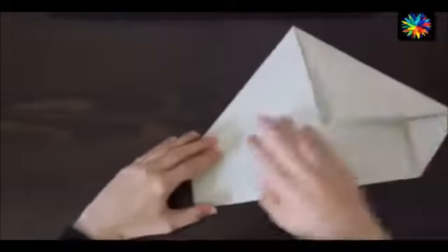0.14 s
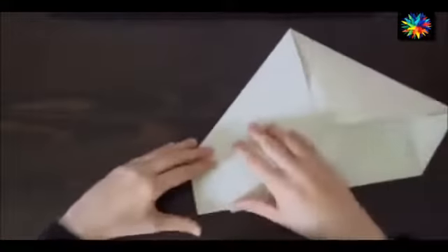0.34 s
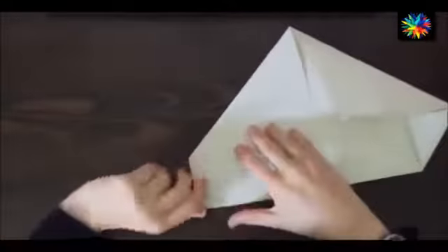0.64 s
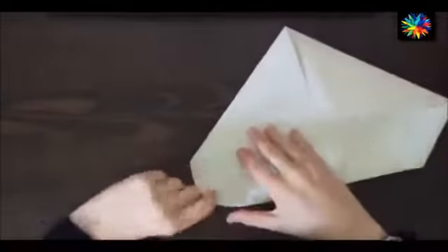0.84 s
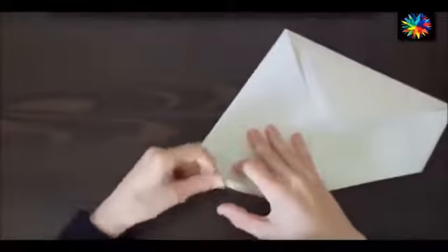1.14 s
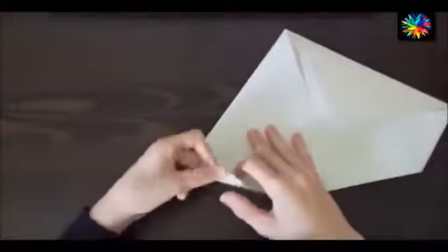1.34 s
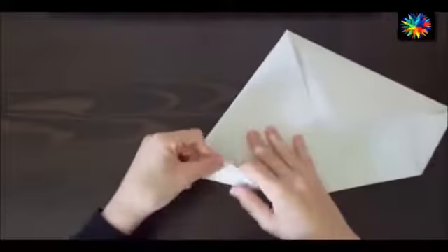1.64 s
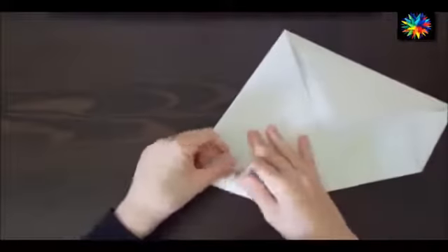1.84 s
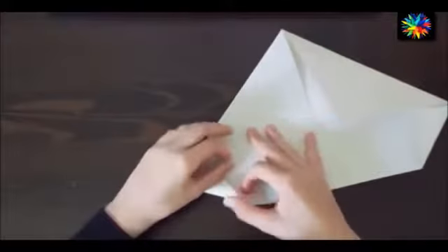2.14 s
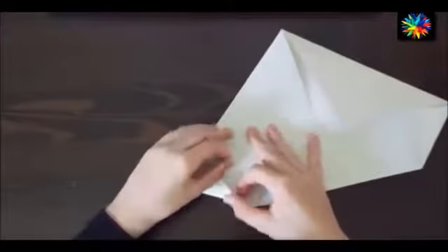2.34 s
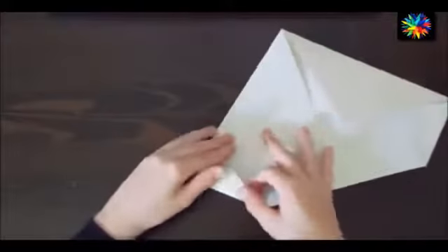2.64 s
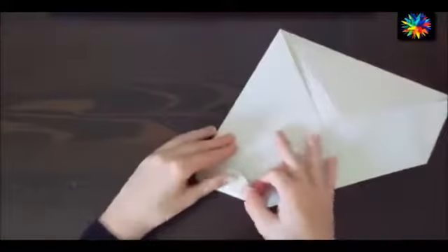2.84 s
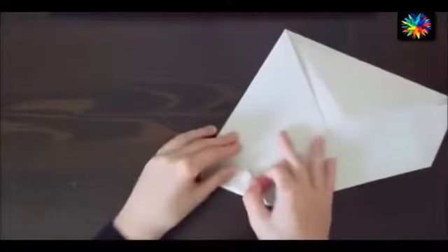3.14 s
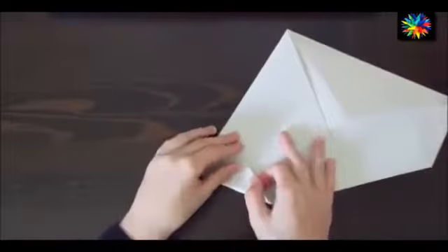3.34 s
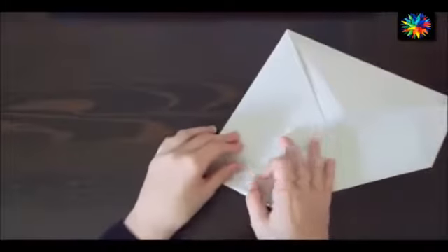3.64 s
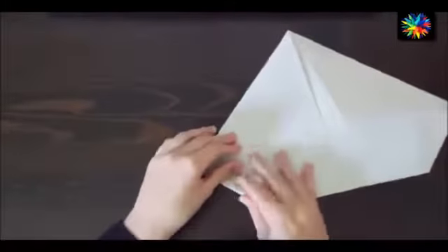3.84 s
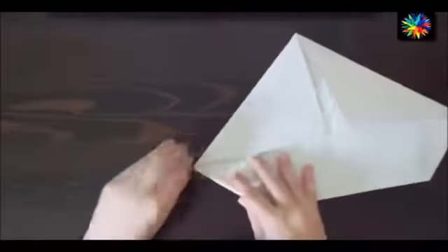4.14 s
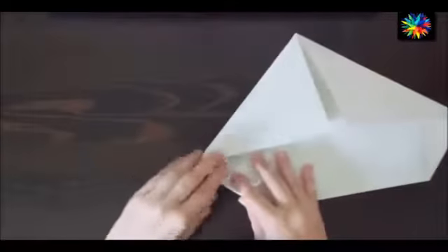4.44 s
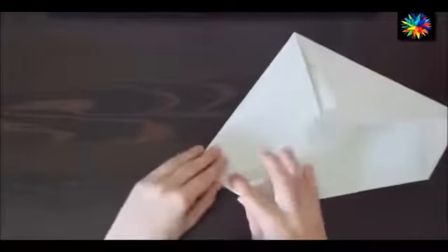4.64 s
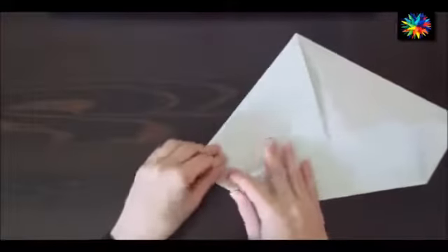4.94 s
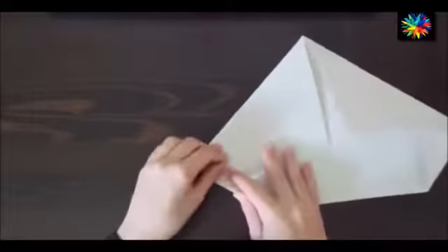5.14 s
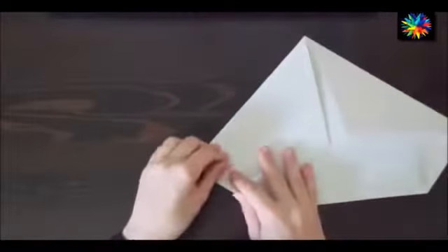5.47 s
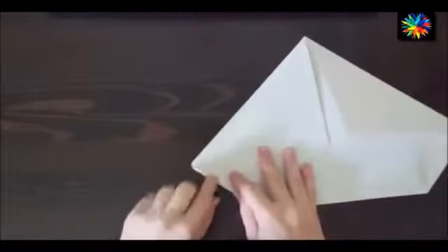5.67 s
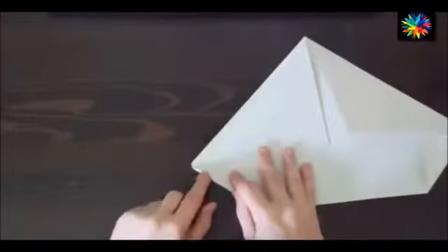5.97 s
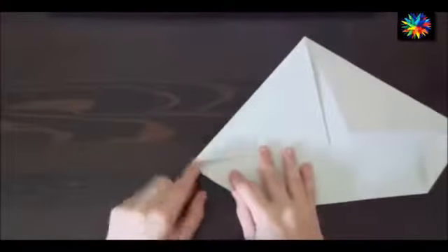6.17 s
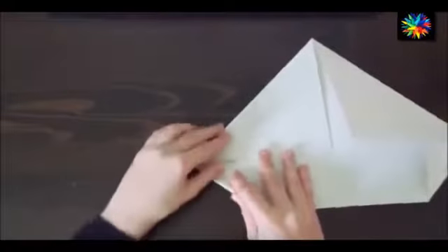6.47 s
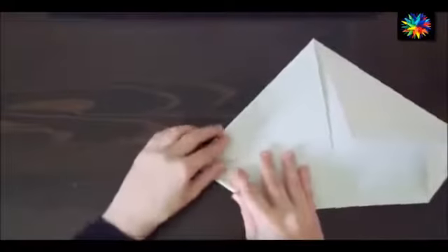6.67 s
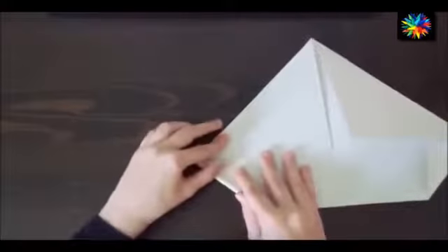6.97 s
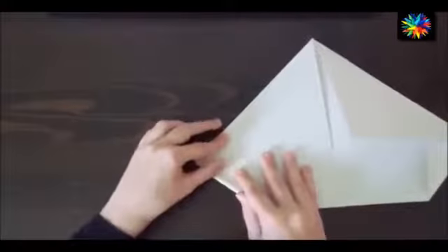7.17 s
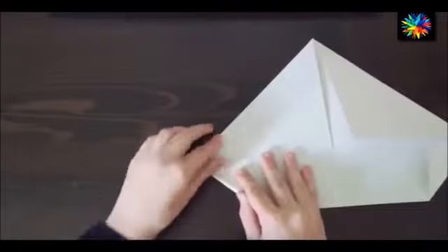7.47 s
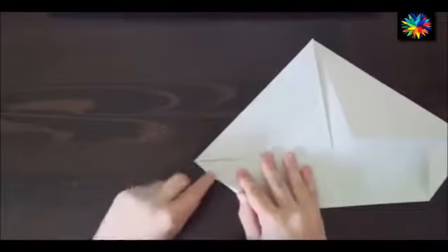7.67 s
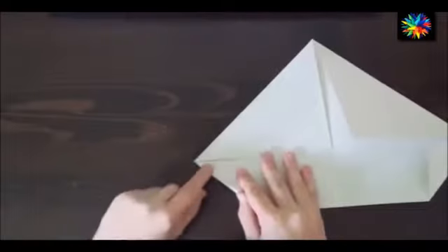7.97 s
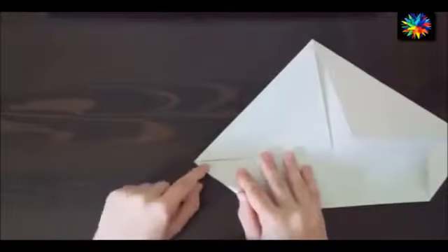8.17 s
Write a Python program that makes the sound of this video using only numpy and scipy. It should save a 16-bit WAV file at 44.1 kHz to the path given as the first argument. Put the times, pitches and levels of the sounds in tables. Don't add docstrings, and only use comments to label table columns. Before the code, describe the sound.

Close stereo pickup of a stiff paper sheet folded on a wooden table in a small room. Fingers hiss and rustle busily over it, with bright snaps near two and three seconds, the loudest just after three. Soft hand thumps and dull distant knocks sit underneath. Another pair of hard cracks comes past five seconds, then faint smoothing and tiny ticks over low rumble and hiss.

```python
import sys
import numpy as np
from scipy import signal
from scipy.fft import rfft, irfft
from scipy.io import wavfile
from scipy.ndimage import uniform_filter1d

SR = 44100
rng = np.random.default_rng(int(sys.argv[2]) if len(sys.argv) > 2 else 0)


def dump(signal):
    limited = np.clip(np.atleast_2d(signal).T, -1, 1)
    pcm = np.round(limited * 32767).astype(np.int16)
    wavfile.write(sys.argv[1], SR, pcm)


def level_to_linear(level):
    exponent = np.asarray(level, float) / 20
    return 10 ** exponent


N = 366471
CUTOFF_HZ = 14100


def rms_one(x):
    return x / np.sqrt(np.mean(x ** 2) + 1e-20)


def in_time(rows):
    s, values = np.transpose(rows)
    return np.interp(np.arange(N) / SR, s, values)


def at_hz(points, hz):
    point_hz, values = np.transpose(points)
    return np.interp(np.log(hz), np.log(point_hz), values)


def drift(rate):
    r = np.exp(-80 * np.pi * rate / SR)
    slow = signal.lfilter([1], [1, -2 * r, r * r], rng.standard_normal(N // 40 + 2002))[2000:]
    return np.interp(np.arange(N) / 40, np.arange(len(slow)), rms_one(slow))


def shaped(x, spectrum):
    hz = np.maximum(np.fft.rfftfreq(N, 1 / SR), 1)
    low_end = np.minimum(1, hz / spectrum[0][0]) ** 3
    return rms_one(irfft(rfft(x) * level_to_linear(at_hz(spectrum, hz)) * low_end, N))


def peak(x, hz, width_hz):
    r = np.exp(-np.pi * width_hz / SR)
    top = (1 - r * r) / 2 * np.array([1, 0, -1])
    return signal.lfilter(top, [1, -2 * r * np.cos(2 * np.pi * hz / SR), r * r], x)


def high_pass(x, order, hz):
    return signal.sosfilt(signal.butter(order, hz, "high", fs=SR, output="sos"), x)


def low_pass(x, order, hz):
    return signal.sosfilt(signal.butter(order, hz, "low", fs=SR, output="sos"), x)


def stereo_noise(spectrum):
    # (f/Hz, likeness 0 to 1)
    likeness = [(30, 0.88), (130, 0.407), (600, 0.45), (3000, 0.1), (14000, 0.08)]
    alike = np.clip(at_hz(likeness, np.maximum(np.fft.rfftfreq(N, 1 / SR), 1)), 0, 1)
    mid, side = rfft(rng.standard_normal((2, N)))
    both = np.sqrt(1 + alike) * mid + np.sqrt(1 - alike) * side * [[1], [-1]]
    return shaped(irfft(both, N), spectrum)


def room_noise():
    # (f/Hz, level/dB per Hz)
    floor_colour = [(71, -18.5), (120, -6), (250, -4.5), (550, -8), (765, -11), (2110, -15.5), (6000, -18),
                    (14000, -18.5)]
    # (t/s, level/dB)
    calming = [
        (0, -53.5),
        (.83, -54),
        (.95, -57),
        (1.7, -55),
        (3.3, -55.5),
        (3.4, -60),
        (4.9, -58),
        (6.1, -63.5),
        (8.31, -63),
    ]
    return level_to_linear(in_time(calming) + 5.0 + 0.28 * drift(11.5)) * stereo_noise(floor_colour)


def table_rumble():
    # (f/Hz, level/dB per Hz)
    rumble_colour = [(8.8, -27.5), (15, 12), (48, -4.5), (70, 0.5), (134, -9.5), (160, -11), (210, -50),
                     (350, -120)]
    # (t/s, level/dB)
    leaning = [(0, -64), (.1, -51), (.39, -48), (.51, -50), (1.16, -57.5), (1.67, -52), (1.83, -61),
               (1.96, -51), (2.24, -61), (2.36, -51), (2.5, -55.5), (3.66, -58), (3.82, -58), (5.0, -58.5),
               (6.43, -61.5), (7.17, -59.5), (7.8, -61.5), (8.0, -62)]
    return level_to_linear(in_time(leaning) + 2.0 * drift(10.0)) * stereo_noise(rumble_colour)


def motor_hum():
    # (f/Hz, level/dB rms)
    tones = [(30, -71), (60, -68.5), (90, -74.5), (120, -71.5), (150, -75.5), (210, -73)]
    t = np.arange(N) / SR
    return sum(level_to_linear(db + 1.0 + 2.0 * drift(3.77)) * np.sin(2 * np.pi * hz * t) for hz, db in tones)


def thumps():
    # (t/s, peak level/dB, f/Hz)
    landings = [
        (0.037, -43.5, 113),
        (0.351, -37.5, 111.3),
        (3.886, -41, 121),
        (6.545, -48.5, 100.3),
        (7.763, -49.5, 95),
    ]
    out = np.zeros(N)
    for s, peak_db, hz in landings:
        t = np.maximum(np.arange(N) / SR - s, 0)
        out += level_to_linear(peak_db - 60 * t / 0.24) * (1 - np.exp(-t / 0.0054)) * np.sin(2 * np.pi * hz * t)
    return out


def knocks():
    # (t/s, peak level/dB)
    blows = [
        (0.413, -36),
        (0.486, -46.5),
        (1.2856, -37.5),
        (2.1629, -38.5),
        (3.255, -39.5),
        (3.541, -43.5),
    ]
    # (f/Hz, level/dB, time to fall by 60 dB/s)
    modes = [(598, -1.5, 0.034), (645, -5, 0.034), (476, -9, 0.09), (367, -7, 0.11), (243, -9, .09),
             (790, -11, 0.039), (1220, -7.5, 0.029), (931, -5, .06), (1820, -3, .03)]
    s, peak_db = np.transpose(blows)
    at, out = np.round(s * SR).astype(int), np.zeros(N)
    for hz, level_db, t60 in modes:
        clicks = np.full(N, 1e-18)
        clicks[at] = level_to_linear(peak_db + level_db + rng.normal(0, 1.5, len(at)))
        clicks[at + 76] = 0.64 * clicks[at]
        clicks[at + 790] = -.5 * clicks[at]
        clicks[at + 1500] = .3 * clicks[at]
        r, w = level_to_linear(-60 / (t60 * SR)), 2 * np.pi * hz / SR
        out += signal.lfilter([0, np.sin(w)], [1, -2 * r * np.cos(w), r * r], clicks)
    return peak(signal.lfilter([.1], [1, -.9], out), 540, 900) * 1.72


def room(x):
    t = np.arange(SR // 2) / SR
    mid, side = rng.standard_normal((2, len(t))) * (1 - np.exp(-t / 0.014))
    tail = (mid + side * [[1], [-1]]) * level_to_linear(-60 * t / 0.22)
    dull = low_pass(tail, 1, 9800)
    tail = dull + .5 * (tail - dull) * level_to_linear(-200 * t)
    tail = tail / np.sqrt(np.sum(tail ** 2) / 2)
    return signal.fftconvolve(x[None], tail, axes=1)[:, :N]


def pressure(s, swell_s, fade_s, db):
    out, t = np.zeros(N), np.arange(N) / SR
    for at, up, down, gain in zip(s, np.maximum(swell_s, .004), np.maximum(fade_s, .004), level_to_linear(db)):
        near = slice(max(int((at - up) * SR), 0), int((at + down) * SR) + 1)
        out[near] += gain * np.interp(t[near], [at - up, at, at + down], [0, 1, 0])
    return out


def fibres(per_s, spread_db):
    sizes = level_to_linear(spread_db * np.minimum(rng.exponential(1, N), 5)) * rng.choice([-1, 1], N)
    slips = sizes * (rng.random(N) < per_s / SR)
    return rms_one(slips) * .5 + rng.standard_normal(N)


def bending(x, depth_db):
    spec = signal.stft(x, nperseg=512)[2]

    def patches(frames, bins):
        chance = uniform_filter1d(rng.standard_normal(spec.shape), size=frames, axis=1)
        return rms_one(uniform_filter1d(chance, size=bins, axis=0))

    field = patches(12, 2) + 0.23 * patches(20, 20)
    return rms_one(signal.istft(spec * level_to_linear(depth_db * field), nperseg=512)[1][:N])


def slide():
    # (f/Hz, level/dB per Hz)
    hiss_colour = [(1500, -14.5), (2500, -2), (3500, 10.5), (5000, 6), (7000, 1), (9000, 2), (11500, 0.5),
                   (13000, 6), (14200, 0)]
    # (f/Hz, level/dB per Hz)
    drum_colour = [(300, -28), (700, -1.5), (1200, -5), (2000, -2), (2800, -2.5), (4500, -29)]
    # (full pressure t/s, swell/s, fade/s, rub level/dB, dry fingertip hiss over
    # it/dB)
    finger_strokes = [(0.0, .01, 0.036, -47, -3), (.03, 0.039, 0.044, -57, 13.5), (.06, 0.025, 0.019, -44, -13),
                      (.175, 0.13, 0.24, -42.5, 8), (.359, 0.021, 0.031, -44.5, 8), (.451, 0.094, 0.035, -47, 6.5),
                      (0.683, 0.12, 0.036, -49.5, 12), (.845, 0.017, 0.058, -43.5, 6.5),
                      (.92, 0.032, 0.051, -51.5, 6), (1.003, 0.051, 0.045, -39.5, 6.5),
                      (1.133, 0.11, 0.076, -47, 6), (1.256, 0.13, 0.03, -44.5, 9), (1.425, 0.23, 0.054, -55, 11.5),
                      (1.742, 0.02, 0.042, -51, -2), (1.798, 0.0046, 0.049, -49, 3), (1.83, .005, 0.037, -46, 11),
                      (1.828, 0.044, 0.4, -49, 5.5), (1.949, 0.086, 0.072, -44.5, 7),
                      (2.122, 0.084, 0.055, -47, 14), (2.223, 0.033, 0.028, -51.5, 8.5),
                      (2.315, 0.02, 0.11, -43.5, -4), (2.407, 0.11, 0.27, -55, 5), (2.602, 0.08, 0.099, -46.5, 7),
                      (2.765, 0.11, 0.066, -46, 7.5), (2.85, 0.053, 0.13, -54, 5.5),
                      (3.001, 0.034, 0.034, -50.5, 9.5),
                      (3.273, 0.27, 0.043, -48, 2), (3.313, 0.021, 0.069, -36.5, 6),
                (3.564, 0.12, 0.058, -52.5, 7), (3.716, 0.044, 0.06, -49, 6), (3.887, 0.13, 0.13, -51, 7),
                (4.035, 0.064, 0.045, -52, -1), (4.27, 0.29, 0.014, -49, 9.5),
                (4.3, 0.032, 0.15, -62.5, 8.5), (4.641, 0.067, 0.062, -64, 3),
                (4.749, 0.085, 0.061, -54, 1.5), (4.869, 0.12, .056, -51, 0.5),
                (5.001, 0.057, 0.12, -61.5, 7), (5.136, 0.11, 0.064, -61, -7), (5.192, 0.068, 0.07, -63, 5),
                (5.503, 0.26, 0.031, -68, 11), (5.691, 0.088, 0.06, -58, 12),
                (5.743, 0.061, 0.12, -49, 4.5),
                      (5.946, 0.025, 0.036, -60, 5.5), (6.034, 0.025, 0.034, -64.5, 9),
                 (6.287, .028, 0.087, -75, -2), (6.389, 0.1, 0.074, -60, 3.5),
                 (6.541, 0.046, 0.077, -63, 6), (6.605, 0.048, 0.08, -56, 2), (6.765, 0.023, 0.14, -62, 6),
                 (6.878, 0.045, 0.048, -52.5, 7), (7.082, 0.19, 0.058, -69.5, 5),
                 (7.507, 0.056, 0.1, -66.5, 7.5), (7.627, 0.063, 0.095, -57.5, 13),
                 (7.734, 0.033, 0.024, -46.5, 9.5), (7.774, 0.036, 0.11, -55, 8),
                 (7.898, 0.14, 0.026, -60, 3), (8.058, .036, 0.036, -63.5, -4)]
    # (t/s, swell/s, fade/s, drumming level/dB)
    flaps = [(.06, 0.023, 0.016, -33), (.359, 0.026, 0.032, -44.5), (1.46, 0.16, 0.086, -63),
             (1.828, 0.1, 0.26, -51), (2.15, 0.067, 0.1, -49), (2.602, 0.21, 0.06, -57),
             (2.766, 0.096, 0.098, -51), (3.312, 0.04, 0.061, -49), (3.716, 0.031, 0.052, -51),
             (4.035, 0.097, 0.071, -58), (4.689, 0.03, 0.03, -47), (4.9, 0.05, 0.11, -64.5),
             (6.605, 0.038, 0.069, -57.5)]
    # (t/s, drumming level/dB)
    restless = [(0, -56), (.55, -72), (.8, -81), (.95, -59), (1.6, -61), (2.3, -79.5), (3.1, -72),
                (3.45, -59), (3.65, -72), (3.8, -73), (4.55, -81), (5.05, -61), (5.3, -77), (5.56, -69),
                (5.88, -71), (6.2, -79), (7.4, -78), (8.31, -73)]
    s, swell_s, fade_s, rub_db, dry_db = np.transpose(finger_strokes)
    rest = level_to_linear(in_time(restless))
    strokes = pressure(s, swell_s, fade_s, rub_db)
    rub = strokes + level_to_linear(-18.5) * rest
    dry_rub = pressure(s, swell_s, fade_s, rub_db + dry_db) + level_to_linear(-11.5) * rest
    drumming = rest + level_to_linear(-10) * strokes + pressure(*np.transpose(flaps))
    hiss = bending(shaped(fibres(6000, spread_db=-1.5), hiss_colour), depth_db=3.0)
    upper = rms_one(high_pass(hiss, 4, 7300))
    lower = rms_one(low_pass(hiss, 4, 7300))
    drum = bending(shaped(fibres(1500, spread_db=1.5), drum_colour), depth_db=2.0)
    grip = level_to_linear(-3.5 + 0.85 * drift(22.0) + 0.96 * drift(140.0))
    return grip * (dry_rub * upper + rub * lower + drumming * drum)


def singing():
    # (t/s, swell/s, fade/s, level/dB, f/Hz)
    songs = [(.06, 0.015, 0.013, -36.5, 2300), (.17, 0.061, .08, -44.5, 4570),
             (1.15, 0.076, 0.16, -49.5, 3200), (1.24, 0.11, .03, -50, 3600),
             (1.15, 0.092, 0.15, -44.5, 8800), (1.42, 0.061, 0.039, -49.5, 3830),
             (1.83, .005, .02, -42, 1710), (1.958, .02, 0.016, -37, 3350), (1.96, 0.047, .012, -41, 2540),
             (2.042, 0.017, .01, -44, 3600), (2.594, .007, .012, -45, 5600),
             (2.615, 0.013, 0.018, -44, 1500), (2.64, 0.024, 0.018, -45.5, 1790),
             (2.75, .015, .012, -48, 1740), (3.32, .02, 0.067, -42, 5800),
             (3.717, 0.0037, 0.0034, -36.5, 2080), (4.69, .02, .03, -57, 1500),
             (5.15, 0.016, .05, -49, 4500), (.85, .02, .03, -46, 8800), (1.005, .02, 0.027, -35, 9950),
             (1.47, .01, 0.061, -51.5, 2600), (2.592, 0.0046, 0.023, -48, 1700),
             (4.79, .01, .015, -51, 4970), (6.599, 0.012, 0.028, -54.5, 348), (6.72, .01, 0.031, -56, 343),
             (7.77, 0.01, 0.038, -54.5, 306)]
    white, out = rng.standard_normal(N), np.zeros(N)
    for s, up, down, db, hz in songs:
        out += pressure([s], [up], [down], [db]) * rms_one(peak(white, hz, 0.15 * hz))
    return out


def ringing(rows):
    out = np.zeros(N)
    t = np.arange(1323) / SR
    for s, peak_db, hz, width_hz in rows:
        i = round(s * SR)
        shape = level_to_linear(peak_db) * np.minimum(1, t / 0.0001) * np.exp(-np.pi * width_hz * t)
        out[i:i + 1323] += shape * np.sin(2 * np.pi * hz * t)
    out = high_pass(out, 2, 700)
    return out * level_to_linear([[.5], [-.5]]) + level_to_linear(-14) * np.roll(out, 9) * [[1], [-1]]


def settling():
    # (t/s, peak level/dB)
    crease_ticks = [
        (6.4597, -54),
        (7.0579, -61),
        (7.1232, -56.5),
        (7.1904, -53),
        (7.2569, -54),
        (7.3901, -60),
        (7.457, -54),
    ]
    return ringing([(s, db, 8000, 330) for s, db in crease_ticks])


def pings():
    # (t/s, peak level/dB, f/Hz, resonance width/Hz)
    panels = [(0.035, -14, 11000, 3000), (.3453, -15, 11000, 3000), (0.3638, -13, 2800, 900),
              (0.3616, -7, 5500, 1500), (1.9505, -22, 11500, 2500), (2.7671, -22, 2150, 550),
              (2.7672, -26, 5400, 1200), (5.121, -0.5, 6160, 1400), (5.124, -12, 7500, 1500),
              (5.7625, -17.5, 4180, 460), (5.7615, -18, 5080, 350), (5.761, -22.5, 1850, 320),
              (5.7608, -18, 6830, 380), (5.7606, -16, 8700, 500), (5.762, -17.5, 16000, 700),
              (5.1212, -20, 1900, 350), (5.1212, -19, 3440, 500), (5.1225, -17, 4400, 500),
              (5.1225, -16, 8360, 500), (5.1212, -9, 16000, 830), (1.8435, -17.5, 1900, 700),
              (2.329, -18, 8000, 600), (2.329, -21, 4800, 500), (3.2964, -4, 5680, 400),
              (3.297, -17, 1400, 300), (2.329, -20, 2100, 340), (2.329, -19, 3200, 1200),
              (3.9022, -20, 1950, 250), (1.8436, -2, 13000, 1500), (1.8459, -12, 3450, 705),
              (2.3293, -23.5, 12600, 2000), (3.297, 4, 11650, 908), (3.2965, 2.5, 14000, 820),
              (3.2973, -1.5, 4590, 720), (3.2967, -15.5, 1110, 252), (3.2963, -2.5, 7700, 900),
              (3.2984, -17, 3350, 310), (3.7212, -29.5, 1060, 190), (3.9024, -4.5, 5300, 990),
              (3.9024, -20, 2200, 346), (3.5, -38, 1130, 250), (5.12115, 7, 10300, 2200),
              (5.7601, 9.5, 11800, 3200), (5.7611, -6, 12000, 1500), (5.1, -39, 840, 270)]
    return ringing(panels)


def buckles(table, build_s, hold, flip):
    out = np.zeros((2, N + 4410))
    t = np.arange(4410) / SR
    for s, peak_db, panel_hz, sheet_hz, sheet_db, t60 in table:
        white, other, aside = rng.standard_normal((3, 4410))
        fall = level_to_linear(-60 * np.maximum(t - build_s - hold * t60, 0) / max(t60, .004))
        rise = np.minimum(1, t / build_s) ** 2
        shape = rise * fall * (1 + flip * np.exp(-((t - build_s) / 0.00023) ** 2))
        crack = signal.lfilter([1, -1], [1, -.6], white * shape * fall ** 0.35)
        crack += 1.46 * peak(white * shape, panel_hz, 0.16 * panel_hz)
        body = peak(other * shape, sheet_hz, 510) + 0.17 * peak(other * shape, 3000, 2107)
        side = level_to_linear(-5.5) * signal.lfilter([1, -1], [1, -.55], aside * shape)
        burst = crack + level_to_linear(sheet_db + 22.0) * body + side * [[1], [-1]]
        i = round(s * SR)
        out[:, i:i + 4410] += level_to_linear(peak_db - 1.0) * burst / np.abs(burst.mean(axis=0)).max()
    return out[:, :N]


def soft_rolls():
    # (t/s, peak level/dB, panel f/Hz, sheet level over panel/dB, time to fall by 60 dB/s)
    rolls = [(0.049, -22.5, 3060, -7.5, 0.069), (1.736, -33.5, 3480, -9, 0.041),
             (1.943, -17, 11300, -15, 0.047), (2.297, -25, 12000, -37, 0.028),
             (2.376, -24, 12100, -39, 0.042), (2.759, -22, 5460, -10.5, 0.029),
             (2.034, -31, 3650, -12, 0.05), (2.609, -32, 3410, -4, 0.16), (3.714, -21, 12400, -35, 0.017),
             (4.679, -37.5, 3350, 3, 0.05), (4.782, -34, 4470, -44, 0.065),
             (6.0235, -41, 10500, -27, 0.056), (6.592, -39.5, 4980, -20, 0.11),
             (7.71, -39, 7100, -27, 0.06), (7.733, -27.5, 9700, -29, 0.022)]
    rows = [(s, db, hz, 1500 - 51 * sheet_db, sheet_db, t60) for s, db, hz, sheet_db, t60 in rolls]
    return buckles(rows, build_s=0.0067, hold=0.13, flip=0)


def sharp_cracks():
    # (t/s, peak level/dB, panel f/Hz, sheet f/Hz, sheet level over panel/dB)
    loud_cracks = [(0.033, -26.5, 5000, 2030, -31), (0.3443, -24.5, 8240, 2510, -16),
                   (0.3609, -20, 5000, 2320, -17), (0.825, -29, 8800, 2050, -41),
                   (1.4577, -23, 7460, 2570, -16), (1.827, -22, 3500, 1590, -13),
                   (1.842, -7.5, 13100, 1920, -13), (2.3282, -6, 13300, 3100, -16.5),
                   (2.5869, -24.5, 5740, 1660, -15), (2.767, -22, 5460, 2000, -14),
                   (3.2948, 3.5, 5760, 1550, -29.5), (3.7208, -17.5, 12600, 1330, -18),
                   (3.9011, -13.5, 5100, 1980, -16), (5.1196, -12, 10100, 2030, -17),
                   (5.7592, -11, 11500, 1930, -30)]
    # (t/s, peak level/dB, panel f/Hz, sheet f/Hz, sheet level over panel/dB)
    ticks = [(0.9595, -37, 9000, 2000, -30), (1.41, -29, 4000, 2500, -28), (2.2024, -38, 8950, 2000, -30),
             (2.2807, -36, 9000, 2000, -30), (2.9756, -39, 8000, 2000, -30), (3.698, -30, 8000, 2000, -30),
             (1.796, -31, 5020, 1520, -11), (4.0945, -32, 10000, 2780, -29),
             (4.617, -32.5, 12300, 1060, -15), (4.657, -34, 3040, 1790, -28), (4.8352, -25, 7300, 985, -21),
             (4.993, -29.5, 10170, 990, -28), (5.9326, -38, 12450, 984, -25),
             (6.278, -34.5, 13500, 1450, -25), (6.541, -41, 8430, 2370, -20.5),
             (6.762, -36, 4090, 1854, -13), (7.4909, -42.5, 9300, 2090, -24),
             (7.592, -34.5, 10200, 1360, -28), (7.8803, -39, 7400, 1795, -25),
             (8.0512, -34.5, 4300, 1180, -30), (8.1638, -33.5, 12570, 1840, -29)]
    rows = [(*row, 0.022 + .006 * max(-17 - row[1], 0)) for row in loud_cracks]
    rows += [(*row, 0.024) for row in ticks]
    return buckles(rows, build_s=0.00128, hold=0.1, flip=1.2)


def scene():
    far = knocks()
    rub = slide() + singing()
    cracks = sharp_cracks() + pings() + settling() + soft_rolls()
    width = level_to_linear(-9.5) * high_pass(np.roll(rub, 331), 2, 3500) * [[1], [-1]]
    echo = room(level_to_linear(-15.5) * cracks.mean(axis=0) + level_to_linear(-10.0) * far)
    background = room_noise() + table_rumble() + motor_hum()
    cut = signal.ellip(12, .5, 75, CUTOFF_HZ, fs=SR, output="sos")
    soft = signal.sosfilt(cut, background + thumps() + far + echo + rub + width + cracks)
    return soft + level_to_linear(-32.0) * cracks * (np.abs(cracks) > .09)


def starved_top(x):
    band_starts = [12400, 13000, 13700]
    gates = [-90.5, -90, -89.5]
    hz, _, spec = signal.stft(x, fs=SR, nperseg=1024)
    for low, high, gate_db in zip(band_starts, band_starts[1:] + [CUTOFF_HZ], gates):
        band = (hz >= low) & (hz < high)
        power = uniform_filter1d(np.mean(np.abs(spec[:, band]) ** 2, axis=(0, 1)), size=5)
        dropped = hz >= low if high == CUTOFF_HZ else band
        spec[:, dropped] *= np.where(power > level_to_linear(2 * gate_db), 1, .03)
    return signal.istft(spec, nperseg=1024)[1][:, :N]


def top_cut(x):
    return signal.sosfilt(signal.butter(12, 16380, fs=SR, output="sos"), x)


def record(dry):
    shaved = high_pass(dry - np.clip(dry, -.97, .97), 2, 600)
    return top_cut(starved_top(dry - shaved))


dry = scene()
out = record(dry)
dump(out)
```